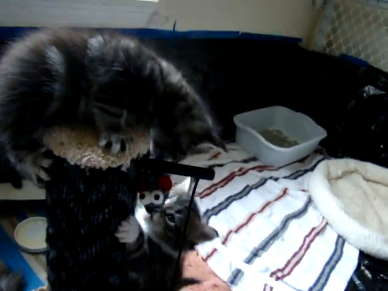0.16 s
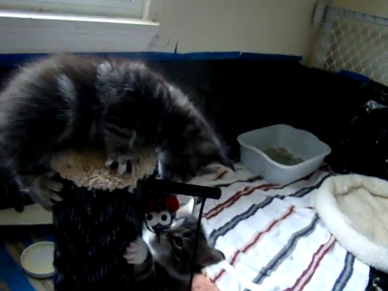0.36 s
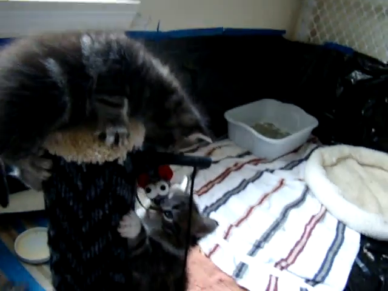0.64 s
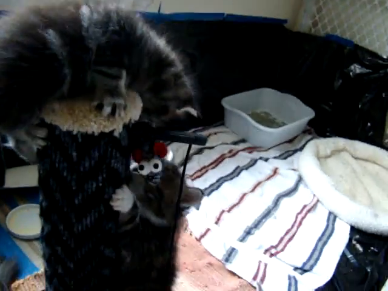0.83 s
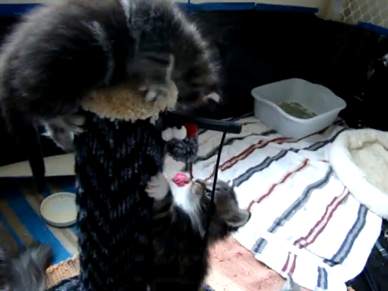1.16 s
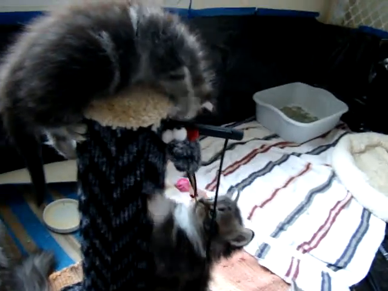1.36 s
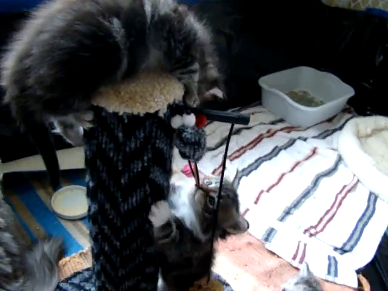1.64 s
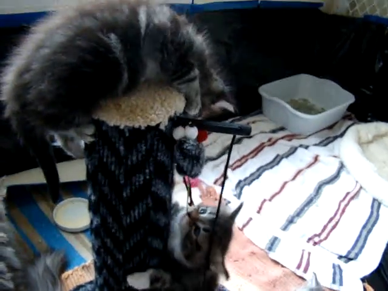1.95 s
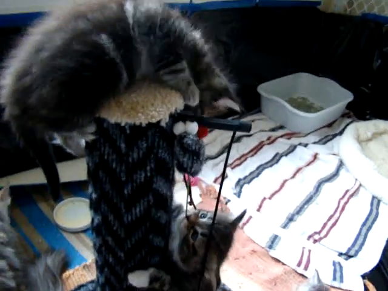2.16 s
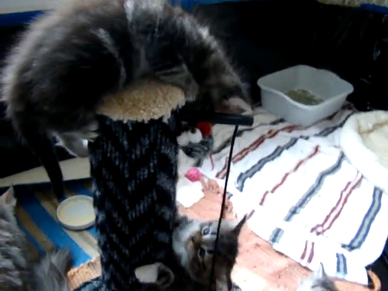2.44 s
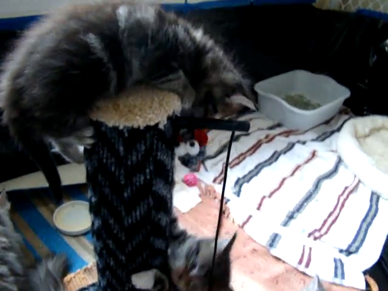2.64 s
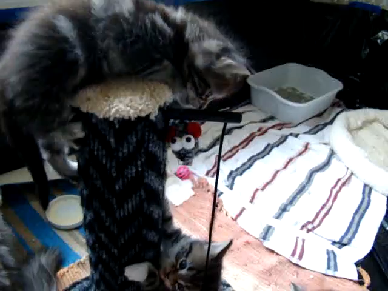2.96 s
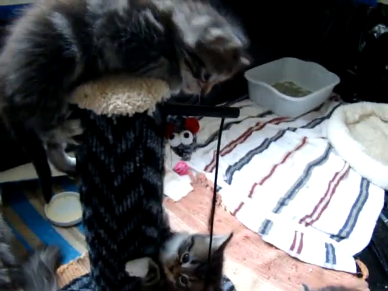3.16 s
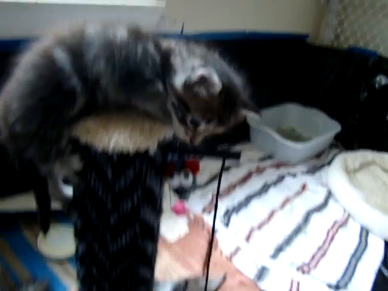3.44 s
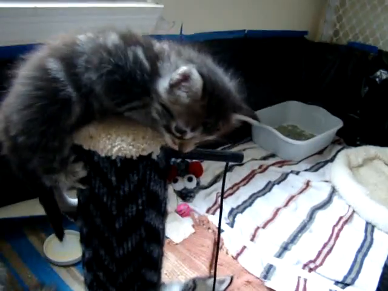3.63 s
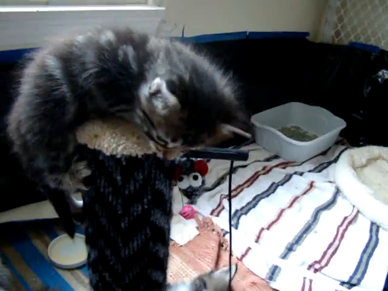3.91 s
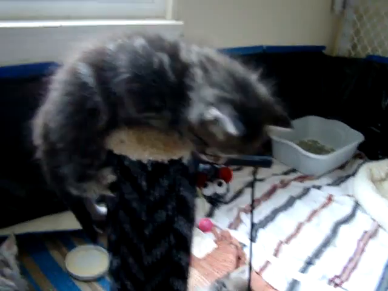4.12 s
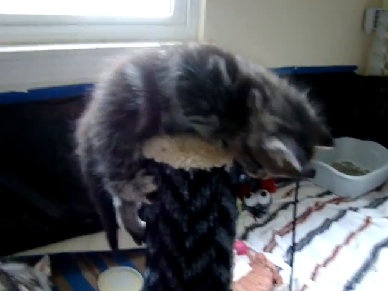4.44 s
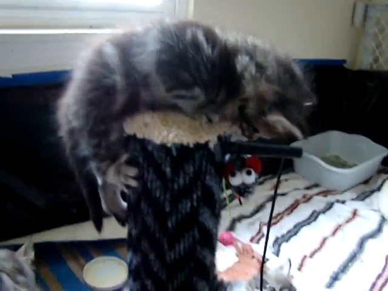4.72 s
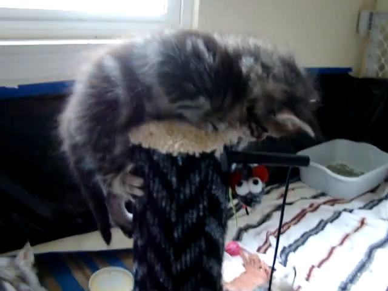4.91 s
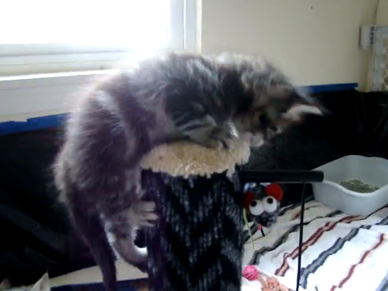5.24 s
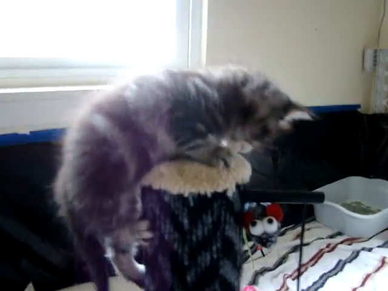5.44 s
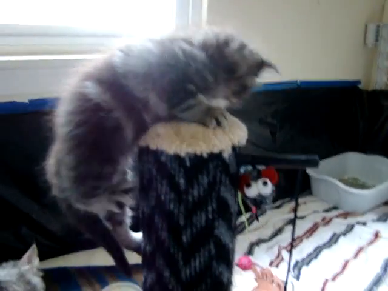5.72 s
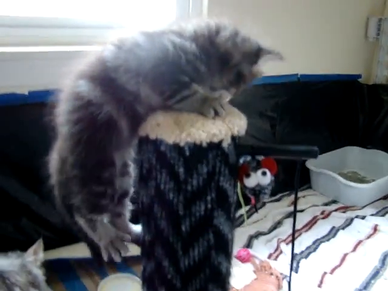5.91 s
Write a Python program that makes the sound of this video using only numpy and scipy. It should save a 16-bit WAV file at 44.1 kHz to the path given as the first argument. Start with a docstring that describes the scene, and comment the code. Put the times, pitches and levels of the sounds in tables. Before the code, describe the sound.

Dry, close claw noise indoors: bright brittle cracks with woody knocks from a padded post, brief rough drags of fur and paws, and thin plastic-like swishes. Plucks come in irregular clusters, with a few dull thumps. The strongest scrabble arrives after three seconds, then activity eases into sparse ticks before another scratch and rustle. The small microphone is thin in the bass, slightly ringing in the treble, with steady faint hiss.

```python
"""Kittens scramble over a carpeted post close to a small camera, indoors.
Claws catch and snap free as noise bursts through ringing modes; hooked claws twang loop by loop.
Fur and paws drag over carpet and sheeting as coloured, gritty noise; paw thuds are short fading swings.
The room hisses faintly, the microphone cavity rings near 5 kHz and some snaps shake the camera body."""
import sys
import numpy as np
from scipy import signal
from scipy.fft import rfft, irfft, next_fast_len
from scipy.io import wavfile
from scipy.ndimage import uniform_filter1d, map_coordinates

SR = 44100
rng = np.random.default_rng(int(sys.argv[2]) if len(sys.argv) > 2 else 0)


def file_out(sig):
    """Save sig as 16-bit WAV at sys.argv[1]."""
    # one column per channel
    cols = np.atleast_2d(sig).T
    # limit, then scale
    lim = np.clip(cols, -1, 1)
    pcm = np.round(lim * 32767).astype(np.int16)
    wavfile.write(sys.argv[1], SR, pcm)


N = 267883  # length in samples


def amp(db):
    """Gain of a level in dB."""
    return 10 ** (np.asarray(db) / 20)


def unit(x):
    """x scaled to an rms of 1."""
    return x / np.sqrt(np.mean(x ** 2) + 1e-20)


def filtered(x, response):
    """x passed through a filter, given as a complex gain for each frequency."""
    m = next_fast_len(N + SR // 2)
    return irfft(rfft(x, m) * response(np.fft.rfftfreq(m, 1 / SR)), m)[..., :N]


def shape(points):
    """Filter gain drawn through (pitch_hz, gain_db) points on a log pitch axis."""
    point_hz, gain_db = np.transpose(points)
    return lambda hz: amp(np.interp(np.log(hz + 1), np.log(point_hz + 1), gain_db))


def resonance(mode):
    """Filter of one broad mode, which rings at its own pitch when struck."""
    pitch, width, gain_db = mode
    return lambda hz: amp(gain_db) * 1j * hz * width / (pitch ** 2 - hz ** 2 + 1j * hz * width)


def wobble(rate):
    """A smooth random curve with `rate` random points a second."""
    knots = rng.standard_normal(int(N * rate / SR) + 4)
    return map_coordinates(knots, [np.arange(N) * rate / SR])


# Colour of the room hush: pitch_hz, gain_db (relative)
ROOM_COLOUR = [(20, 0), (40, -2), (90, -3), (190, -3), (400, -2), (1200, -1), (2500, -7), (4600, -8),
               (10000, -10)]
ROOM_DB = -56  # before the bass cut


def room():
    """The steady hush of room and microphone: coloured noise with a barely wavering level."""
    hush = unit(filtered(rng.standard_normal(N), shape(ROOM_COLOUR)))
    return amp(ROOM_DB + 0.22 * wobble(34)) * hush


def fibres(per_second, spread_db, life):
    """Envelope of fibres letting go at random moments and strengths, each fading over `life` seconds."""
    happens = rng.random(N) < per_second / SR
    kicks = happens * amp(spread_db * rng.exponential(size=N))
    fade = np.exp(-np.arange(SR // 50) / SR / life)
    return unit(signal.fftconvolve(kicks, fade)[:N])


def friction(points, rough):
    """Coloured noise roughened by plucked fibres; its colour shifts in patches as the contact moves."""
    grit = 1 + rough * fibres(per_second=250, spread_db=2.5, life=.0015)
    spectrum = signal.stft(rng.standard_normal(N), nperseg=256)[2]
    patches = rng.standard_normal(spectrum.shape)
    patches = uniform_filter1d(patches, size=5, axis=0)  # across pitch
    patches = uniform_filter1d(patches, size=11, axis=1)  # along time
    noise = signal.istft(spectrum * amp(1.8 * unit(patches)), nperseg=256)[1][:N]
    return unit(grit * filtered(noise, shape(points)))


# Fur shifting on carpet between strokes: time_s, scrape_level_db
RUSTLE_LEVELS = [(0, -44.5), (.45, -51), (.75, -59.5), (1.0, -56), (1.35, -61.5), (1.62, -59), (1.9, -56.5),
                 (2.1, -63), (2.4, -57), (2.75, -51), (3.08, -52.5), (3.36, -114), (3.55, -55), (3.7, -61),
                 (3.95, -62), (4.1, -55), (4.8, -61), (5.4, -52.5), (5.75, -49.5), (6.07, -49.5)]
RUSTLE_HISS_DB, RUSTLE_SWISH_DB = -19, -6.5  # relative to the rustle's scrape
# One paw or body dragging once: start_s, length_s, carpet_scrape_db, claw_hiss_db, sheeting_swish_db,
# rubbed_patch_pitch_hz (levels are those halfway through, before the pressure wavers)
DRAG_STROKES = [(0.037, 0.084, -44, -38.5, -41, 1720), (0.164, 0.053, -48, -41.5, -46.5, 1610),
                (0.236, 0.18, -47, -43, -48, 1530), (0.509, 0.035, -49.5, -64, -67, 635),
                (0.624, 0.0024, -38.5, -51, -48, 2900), (0.664, 0.053, -44, -49.5, -41.5, 1910),
                (0.817, 0.029, -49.5, -53.5, -83, 1900), (0.974, 0.017, -41.5, -47, -47, 1400),
                (1.073, 0.0036, -48.5, -59, -58, 870), (1.118, 0.03, -46, -73, -56.5, 700),
                (1.272, 0.011, -49.5, -47, -56, 1190), (1.417, 0.0033, -42.5, -63, -61, 1500),
                (1.45, 0.077, -45.5, -52.5, -44, 2900), (1.567, 0.06, -49, -56, -59, 1400),
                (1.679, 0.022, -47.5, -73, -85, 1230), (1.736, 0.03, -43, -50, -48.5, 2700),
                (1.964, 0.033, -41.5, -87, -65, 1400), (2.202, 0.04, -52.5, -61, -50, 1000),
                (2.428, 0.075, -47, -53, -45, 1710), (2.522, 0.034, -48.5, -48, -44.5, 1660),
                (2.627, 0.049, -54, -40.5, -42, 1370), (2.705, 0.0083, -60, -38, -48.5, 1300),
                (2.907, 0.043, -65, -69, -52, 1180), (3.022, 0.01, -45, -58, -41.5, 2920),
                (3.114, 0.055, -52, -54, -70, 970), (3.232, 0.011, -44.5, -71.5, -89, 1750),
                (3.287, 0.0049, -42.5, -43, -51, 1190), (3.419, 0.019, -38.5, -68, -66.5, 1360),
                (3.46, 0.015, -38, -33, -33.5, 1700), (3.49, 0.0075, -35.5, -47, -42.5, 1300),
                (3.516, 0.023, -46, -57, -45.5, 1160), (3.992, 0.058, -46, -42.5, -50, 1280),
                (4.134, 0.022, -51, -51.5, -52.5, 1050), (4.356, 0.13, -59.5, -75, -62, 1280),
                (4.65, 0.023, -56, -66, -55, 900), (4.874, 0.0073, -55.5, -67, -53, 1450),
                (5.015, 0.0053, -47.5, -50.5, -60, 1010), (5.237, 0.098, -54, -59, -80, 930),
                (5.484, 0.077, -48.5, -60, -47, 990), (5.569, 0.12, -44.5, -58, -36.5, 1010),
                (5.797, 0.035, -57, -59, -46, 1600)]
ATTACK_DB_PER_S, RELEASE_DB_PER_S = 1231, 550  # how fast a stroke bites and lets go
SWELL_DB = 2.5  # a stroke presses hardest halfway, this much above its ends
PATCH_DB, PATCH_Q = 1, 4.2  # ring of the rubbed patch relative to the scrape; its sharpness
UNEVEN_DB, UNEVEN_PER_S = 1.5, 60  # pressure wavers: typical size, random points a second


def strokes():
    """Scrape, hiss and swish levels and the patch ring: strokes bite, hold and let go over the rustle."""
    t = np.arange(N) / SR
    rustle_db = np.interp(t, *np.transpose(RUSTLE_LEVELS))
    layer_db = np.array([[0], [RUSTLE_HISS_DB], [RUSTLE_SWISH_DB]])
    power = amp(2 * (rustle_db + layer_db))  # doubled dB gives power, so that layers add
    grit = friction([(300, 0), (5000, 0)], rough=.5)  # level points: no added colour
    patch = np.zeros(N)
    for s, length, *levels_db, hz in DRAG_STROKES:
        fall_db = ATTACK_DB_PER_S * np.maximum(s - t, 0)
        fall_db += RELEASE_DB_PER_S * np.maximum(t - s - length, 0)
        fall_db += SWELL_DB * np.clip(2 * (t - s) / length - 1, -1, 1) ** 2
        near = fall_db < 40  # skip the faint rest
        power[:, near] += amp(2 * (np.array(levels_db)[:, None] - fall_db[near]))
        ring = unit(signal.lfilter(*signal.iirpeak(hz, PATCH_Q, SR), grit[near]))
        patch[near] += amp(levels_db[0] + PATCH_DB - fall_db[near]) * ring
    return np.vstack([np.sqrt(power), patch]) * amp(UNEVEN_DB * wobble(UNEVEN_PER_S))


LEAD_IN_S, LEAD_IN_DB = .003, -11  # short faint noise rising for 3 ms before each burst's time
KICK_S = .0005  # delay of the kick after that time
COLOUR_SPREAD_DB = 4  # each catch rings the modes in its own mix


def bursts(times, levels_db, modes, kick, t60, soft_hz, detune):
    """At each time a faint rise of noise, one kick and a short puff of noise ring the modes, tuned anew."""
    t = np.arange(SR // 20) / SR
    click = np.arange(N) == 0
    rings = []
    for mode in modes:
        softened = lambda hz: resonance(mode)(hz) / (1 + 1j * hz / soft_hz) ** 2
        rings.append(filtered(click, softened)[:len(t)])
    after = t - LEAD_IN_S - KICK_S
    lead_in = amp(LEAD_IN_DB) * t / LEAD_IN_S
    swell = np.where(after < 0, lead_in, amp(-60 * np.abs(after) / t60))
    out, lead = np.zeros(N + SR), round(LEAD_IN_S * SR)
    for s, db in zip(times, levels_db):
        puff = swell * rng.standard_normal(len(t))
        puff[lead + round(KICK_S * SR)] = -kick * amp(rng.normal(0, COLOUR_SPREAD_DB))
        body = np.zeros(len(t))
        for ring in rings:
            retuned = np.interp(t * (1 + rng.normal(0, detune)), t, ring)
            body += amp(rng.normal(0, COLOUR_SPREAD_DB)) * retuned
        sound = signal.fftconvolve(puff, body)[:len(t)]
        sound *= np.sqrt(SR / 625) / np.linalg.norm(sound)  # energy of 1.6 ms at the given level
        out[round(s * SR):][:len(t)] += amp(db) * sound
    return out[lead:lead + N]


# Ringing of claw and microphone cavity: pitch_hz, width_hz, gain_db (relative)
CRACK_MODES = [(5120, 380, 2.5), (4646, 340, 14), (4110, 550, 3.5), (2900, 900, -3.5)]
# Ringing of the post: pitch_hz, width_hz, gain_db (relative)
POST_MODES = [(950, 940, -6), (1475, 300, 0.5), (1860, 450, -1.5), (2345, 500, -4.5)]
TICKS_PER_S = 60
TICK_DB, TICK_SPREAD_DB = 2, 2  # lowest level over the scrape, before the tilt; mean extra level


def ticks(scrape):
    """Claws catch lightly at random moments, each leaning to a bright crack or a post knock."""
    place, size, tilt = rng.random((round(6 * TICKS_PER_S), 3)).T
    at = place * (N - 1) / SR
    scrape_db = 20 * np.log10(scrape[(at * SR).astype(int)])
    tick_db = scrape_db + TICK_DB - TICK_SPREAD_DB * np.log(1 - size)
    crack = bursts(at, tick_db - 16 * tilt, CRACK_MODES,
                   kick=1.8, t60=0.022, soft_hz=6000, detune=0.059)
    knock = bursts(at, tick_db - 6 * (1 - tilt), POST_MODES,
                   kick=7.6, t60=0.0039, soft_hz=2600, detune=0.063)
    return crack + knock


# Colours of carpet pile, claw tips and sheeting, in that order: pitch_hz, gain_db (relative)
SCRAPE_COLOUR = [(50, -0.5), (200, -5.5), (350, 3), (900, 0), (1500, -0.5), (2100, 0), (3000, -7.5),
                 (5000, -33)]
HISS_COLOUR = [(2500, -22), (3600, 1), (4150, 18.5), (4750, 24.5), (5250, 14), (5700, -6.5), (7000, -16.5)]
SWISH_COLOUR = [(1200, -27.5), (2500, 5), (3300, 13), (6000, 7), (8000, 6), (10000, 2)]


def drag():
    """Pile, claw tips and sheeting each rub with their own colour; claws catch lightly as they go."""
    scrape, hiss, swish, patch = strokes()
    rub = scrape * friction(SCRAPE_COLOUR, rough=.55)
    rub += hiss * friction(HISS_COLOUR, rough=.4)
    rub += swish * friction(SWISH_COLOUR, rough=.14)
    return rub + patch + ticks(scrape)


# Treble of a snap: pitch_hz, width_hz, gain_db (relative)
EDGE_MODES = [(6580, 6300, 23), (8940, 1400, -1)]
# Claws snapping free: time_s, bright_crack_db, post_knock_db, top_edge_db
CLAW_SNAPS = [(0.1317, -25, -31.5, -17.5), (0.1522, -16, -24.5, -23), (0.2335, -33.5, -29.5, -32.5),
              (0.3029, -47, -24, -51), (0.3999, -43, -27.5, -23.5), (0.5244, -24.5, -48, -36.5),
              (0.6128, -30, -36, -30.5), (0.6604, -30.5, -26.5, -33.5), (0.6745, -31.5, -32, -38.5),
              (0.7692, -23.5, -23, -28), (0.7747, -30, -31.5, -40), (0.7817, -28, -36, -46),
              (0.792, -58, -37, -56), (0.809, -38, -25.5, -41.5), (0.8168, -28.5, -26, -37.5),
              (0.877, -39.5, -39.5, -46), (0.962, -31.5, -31.5, -49), (1.0277, -36.5, -32.5, -47),
              (1.0346, -35, -35.5, -53), (1.1096, -40, -34.5, -52), (1.2488, -21, -32.5, -31.5),
              (1.2541, -22.5, -21, -54), (1.2754, -33.5, -38.5, -39), (1.3674, -34.5, -53, -40),
              (1.3784, -33, -42.5, -53), (1.4004, -67, -31.5, -66), (1.4097, -55, -31, -50.5),
              (1.419, -19.5, -33, -27.5), (1.4324, -29, -47, -39), (1.44, -26, -26.5, -25.5),
              (1.4834, -40, -33, -32.5), (1.5644, -36, -30, -46), (1.6522, -22, -35, -33.5),
              (1.6556, -23, -29.5, -33), (1.6823, -27.5, -36, -35), (1.737, -28, -27.5, -31.5),
              (1.8136, -41.5, -32, -47), (1.9359, -25.5, -40.5, -51), (1.9549, -39, -24.5, -47),
              (1.9699, -18.5, -23, -42), (1.9926, -32.5, -30.5, -54), (2.0006, -51, -23.5, -43),
              (2.0408, -34.5, -33.5, -54), (2.0912, -37.5, -42, -51), (2.1296, -21.5, -29.5, -30.5),
              (2.177, -32, -31, -53), (2.315, -52, -38, -54.5), (2.4395, -37, -35, -37),
              (2.4496, -35.5, -28.5, -35), (2.4738, -30, -24.5, -49), (2.521, -35.5, -30, -39.5),
              (2.5499, -32.5, -41, -42), (2.6081, -40.5, -32, -26.5), (2.5305, -46.5, -34, -44),
              (2.9418, -44.5, -44, -34), (3.0137, -41.5, -41, -36.5), (3.1173, -22.5, -25.5, -30.5),
              (3.1549, -30.5, -33.5, -36.5), (3.199, -18.5, -20.5, -46), (3.2213, -20, -18.5, -37.5),
              (3.2328, -26.5, -34, -55), (3.25, -19.5, -21, -42), (3.2857, -23.5, -23, -28.5),
              (3.3376, -19, -21.5, -36), (3.3701, -19, -24, -40), (3.3854, -50, -25, -59),
              (3.4053, -13.5, -15, -29), (3.4094, -20, -30, -19), (3.419, -21, -27, -38),
              (3.426, -25, -26.5, -40), (3.4551, -25.5, -21.5, -28.5), (3.4622, -18.5, -20.5, -25),
              (3.473, -35, -23.5, -42), (3.4868, -22.5, -25, -30), (3.494, -31, -32, -25),
              (3.508, -50, -23, -55), (3.5935, -27.5, -34, -32), (3.6225, -32, -31.5, -57),
              (3.6482, -30.5, -36, -26), (3.7856, -39, -37.5, -33.5), (3.912, -44, -35, -63),
              (3.965, -31, -40.5, -47.5), (4.021, -31.5, -30, -38.5), (4.204, -40, -39.5, -51),
              (4.2268, -34, -30.5, -56), (4.265, -35.5, -48, -50), (4.279, -31, -38, -39.5),
              (4.2914, -37.5, -33.5, -47), (4.3048, -57, -37.5, -63), (4.3313, -22, -32.5, -46),
              (4.4849, -34, -32.5, -39.5), (4.572, -47, -38, -44.5), (4.789, -45.5, -36.5, -58),
              (4.967, -51, -42.5, -51), (5.0087, -36, -31.5, -44), (5.1996, -49.5, -35.5, -45),
              (5.2422, -42, -32.5, -37.5), (5.258, -41, -43, -66), (5.272, -26, -36, -34),
              (5.289, -52, -32, -56), (5.298, -27, -28, -37.5), (5.362, -49, -30.5, -44.5),
              (5.367, -40, -38, -47.5), (5.423, -53, -46.5, -35), (5.5385, -16, -25, -37.5),
              (5.5612, -24.5, -35, -33.5), (5.7734, -43.5, -41, -36.5), (5.8392, -41, -36, -43),
              (5.895, -20.5, -41, -33), (5.9366, -31.5, -35, -34.5), (5.9814, -34, -35.5, -49),
              (6.0327, -32.5, -39, -46)]


def snaps():
    """Each released claw cracks, knocks the post and spits a little treble."""
    s, crack_db, knock_db, edge_db = np.transpose(CLAW_SNAPS)
    crack = bursts(s, crack_db, CRACK_MODES, kick=9, t60=0.011, soft_hz=6000, detune=.025)
    knock = bursts(s, knock_db, POST_MODES, kick=9, t60=0.013, soft_hz=3200, detune=.08)
    edge = bursts(s, edge_db, EDGE_MODES, kick=3, t60=0.013, soft_hz=15000, detune=.04)
    return crack + knock + edge


# Snaps that also shake the camera body: time_s, peak_level_db
BODY_JOLTS = [(.1318, -37), (.1536, -36), (.4006, -37), (.7704, -46), (1.4195, -36), (3.4063, -38),
              (5.543, -39)]
JOLT_S = .0005  # time to the top of a jolt


def jolts():
    """One soft one-way push carried by the camera body, deep bass included."""
    out, u = np.zeros(N + SR), np.arange(SR // 100) / SR / JOLT_S
    for s, db in BODY_JOLTS:
        out[round(s * SR):][:len(u)] += amp(db) * u * np.exp(1 - u)
    return out[:N]


# Paws landing: time_s, level_db, settled_pitch_hz, fade_s (time to fall 60 dB, at least 0.003 s is used)
PAW_THUDS = [(0.153, -40, 553, 0.069), (0.312, -32, 367, 0.16), (0.524, -36.5, 201, 0.012),
             (0.778, -40.5, 161, 0.065), (0.874, -41, 150, 0.026), (1.254, -15.5, 410, 0.0052),
             (1.27, -28.5, 227, 0.022), (1.373, -39, 284, 0.0072), (1.51, -37.5, 380, 0.016),
             (1.56, -41.5, 185, 0.079), (1.643, -46, 278, 0.015), (1.972, -22, 625, 0.0017),
             (1.993, -31.5, 572, 0.084), (2.043, -32.5, 275, 0.012), (2.612, -18.5, 434, 0.02),
             (2.749, -41.5, 243, 0.22), (2.949, -44, 252, 0.042), (3.129, -30, 267, 0.027),
             (3.147, -28, 252, 0.016), (3.167, -33, 266, 0.046), (3.283, -21.5, 328, 0.019),
             (3.369, -34, 390, 0.032), (3.406, -26.5, 350, 0.025), (3.462, -30.5, 600, 0.012),
             (3.487, -30, 310, 0.0096), (3.513, -31, 157, 0.086), (3.656, -40, 164, 0.055),
             (4.032, -36.5, 564, 0.14), (5.466, -38, 503, 0.018), (5.576, -32, 203, 0.066)]


def thuds():
    """A paw pushes the padded post: a quick dent, then a slower swing back, at times a few."""
    out, t = np.zeros(N + SR), np.arange(SR // 5) / SR
    for s, db, hz, t60 in PAW_THUDS:
        turns = hz * t + 0.12 * (1 - np.exp(-4 * hz * t))  # the first swing is stiffer, so faster
        push = -np.sin(2 * np.pi * turns) * amp(-60 * t / max(t60, .003))
        push *= np.sqrt(SR / 600) / np.linalg.norm(push)  # energy of 1.7 ms at the given level
        out[round(s * SR):][:len(t)] += amp(db) * push
    return out[:N]


# A hooked claw slipping loop by loop through the carpet: start_s, loops (count), first_gap_s,
# gap_ratio (next gap over this one), level_db (before softening), change_db (per loop), start_pitch_hz
SLIP_RUNS = [(.2408, 6, .0054, .9, -19, -1, 1500), (.3066, 5, .0063, .91, -18, -.5, 1370),
             (1.6987, 1, 0, 1, -32, 0, 1200), (1.7115, 5, .0068, 1.14, -24, 0, 1220),
             (1.5215, 3, .0055, 1, -29, 0, 1400), (1.9595, 4, .0036, .95, -21, -1, 1450),
             (1.978, 2, .004, 1, -25, -4, 1500)]


def slips():
    """Each loop let go twangs; its pitch climbs as the pile springs back."""
    out, t = np.zeros(N + SR), np.arange(SR // 40) / SR
    for s, loops, gap, ratio, db, change_db, hz in SLIP_RUNS:
        for k in range(loops):
            tone = np.sin(2 * np.pi * hz * (t + 45 * t * t))
            spit = 0.5 * np.exp(-t / 0.001) * rng.standard_normal(len(t))
            level_db = db + change_db * k + rng.normal(0, 1) - 60 * t / 0.014
            out[round(s * SR):][:len(t)] += amp(level_db) * (tone + spit)
            s += gap * ratio ** k
    return filtered(out[:N], lambda hz: 1 / (1 + 1j * hz / 2500))  # softens the treble


def scene():
    """Hits over friction and hush; the small port loses the deep bass of all that comes by air."""
    air = room() + drag() + snaps() + thuds() + slips()
    through_port = filtered(air, lambda hz: (1j * hz / (1j * hz + 110)) ** 2)
    return (through_port + jolts())[None]


TOP_HZ = 10120  # band limit


def record(dry):
    """The camera keeps nothing above its band limit."""
    return filtered(dry, lambda hz: hz < TOP_HZ)


dry = scene()
out = record(dry)
file_out(out)
```